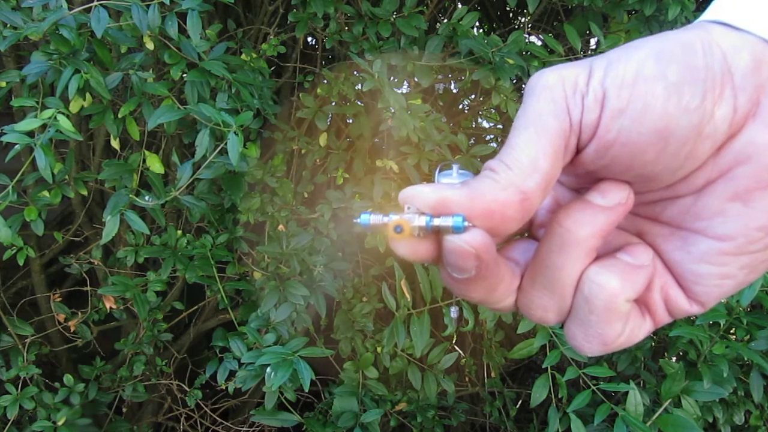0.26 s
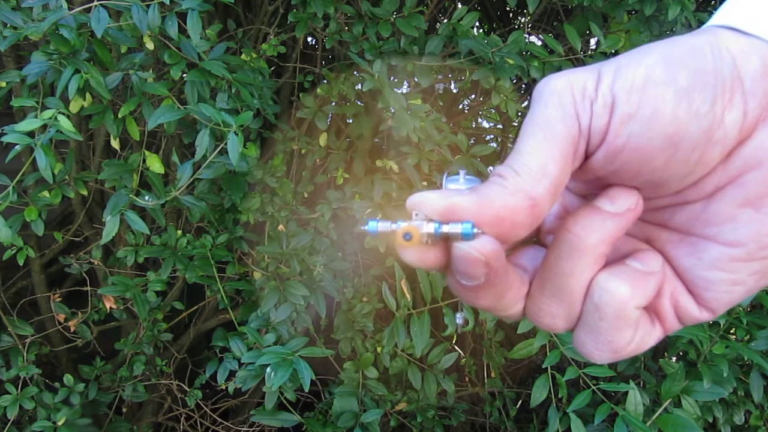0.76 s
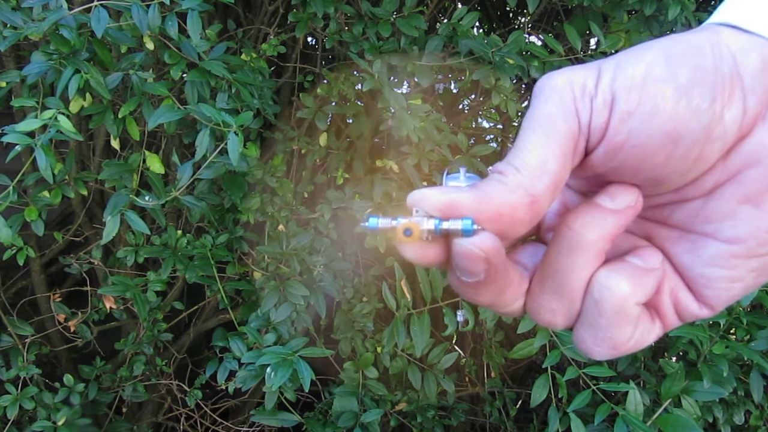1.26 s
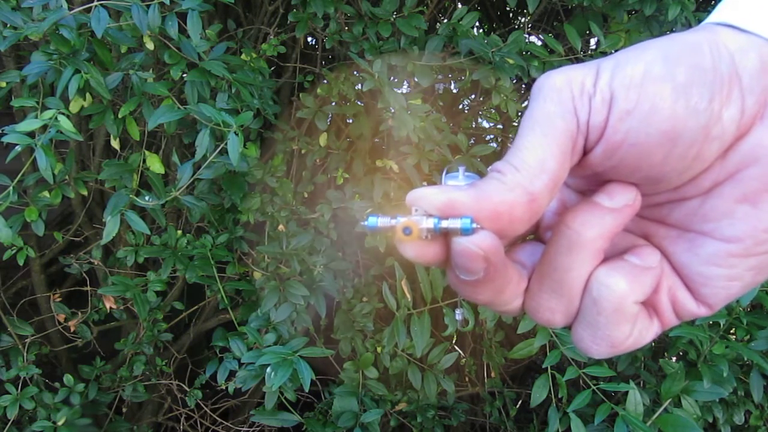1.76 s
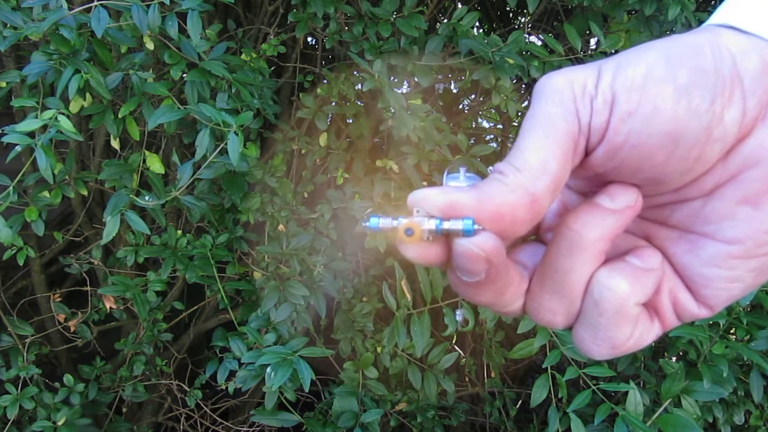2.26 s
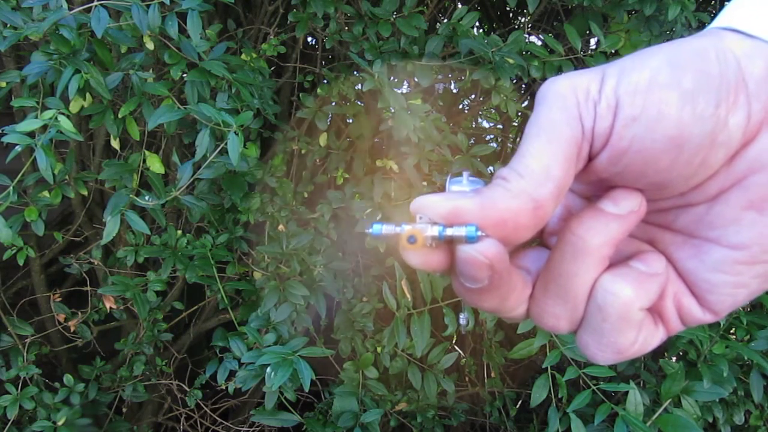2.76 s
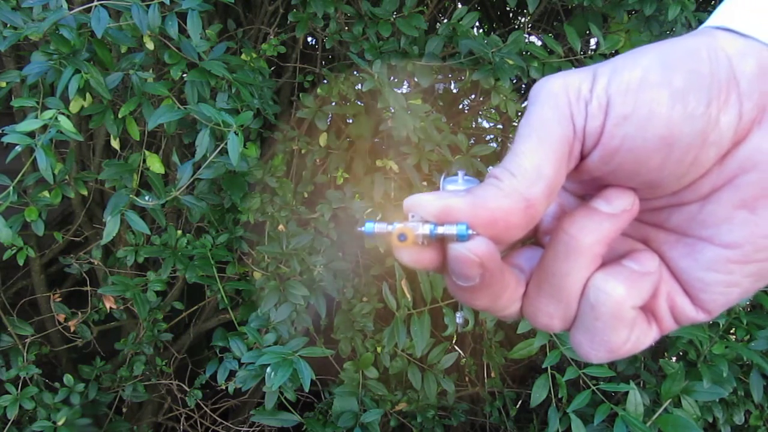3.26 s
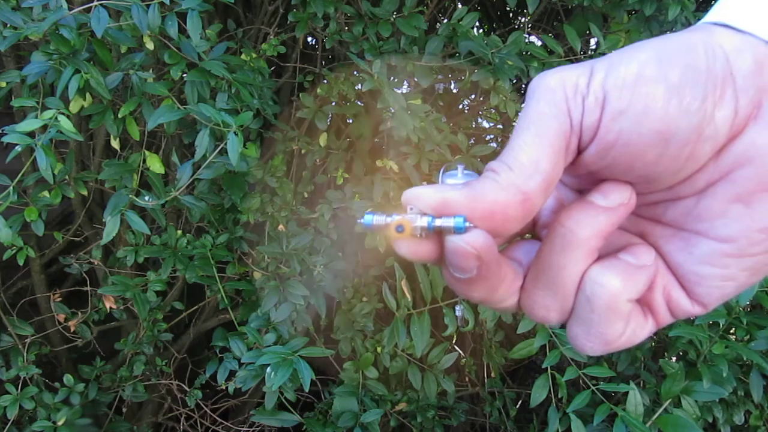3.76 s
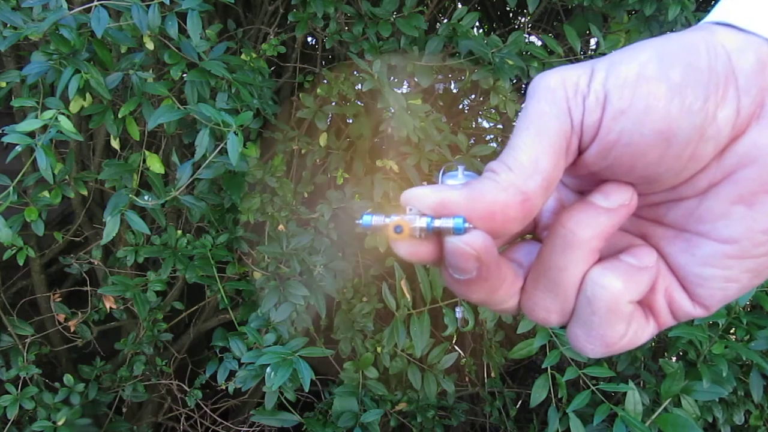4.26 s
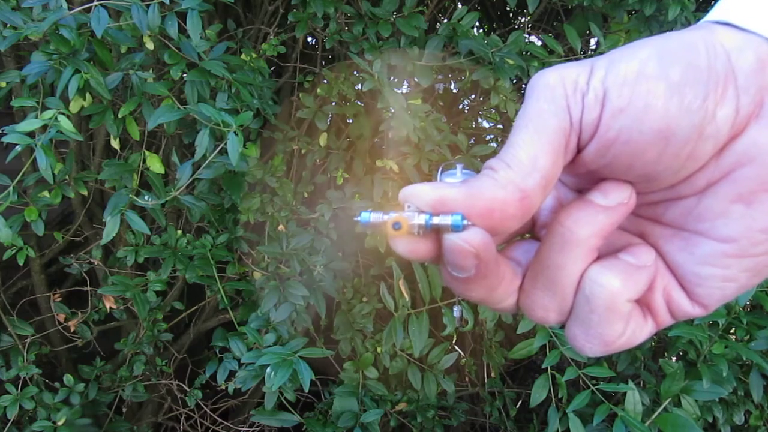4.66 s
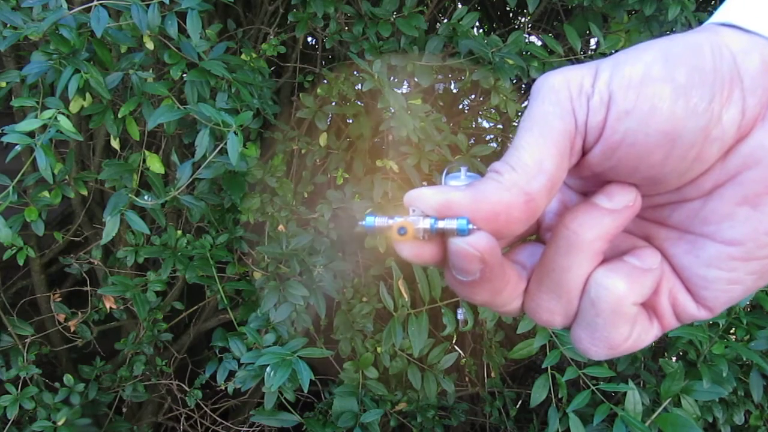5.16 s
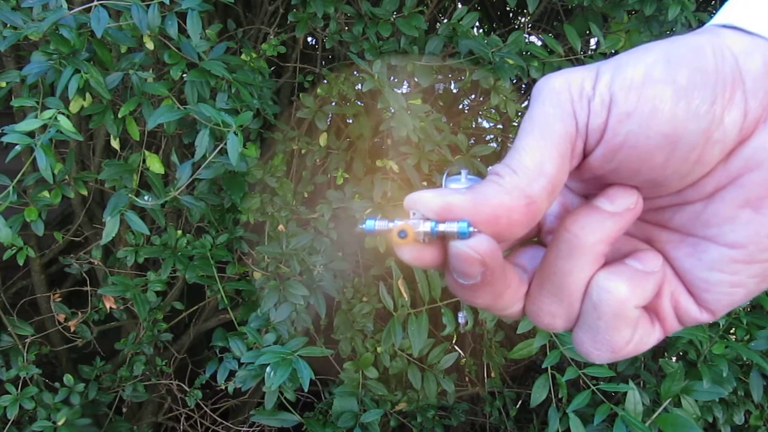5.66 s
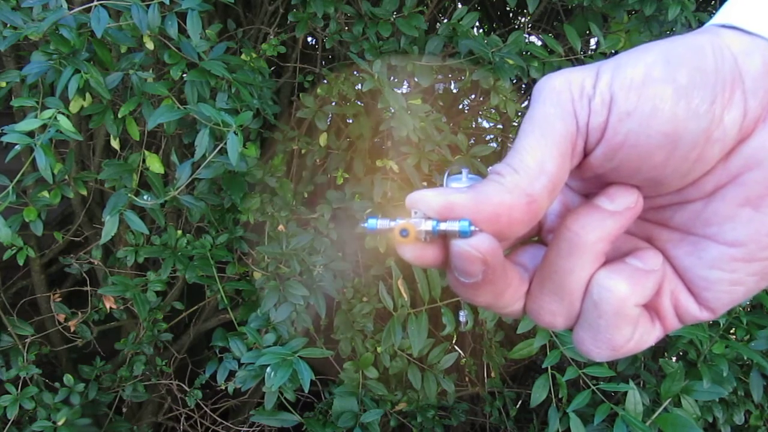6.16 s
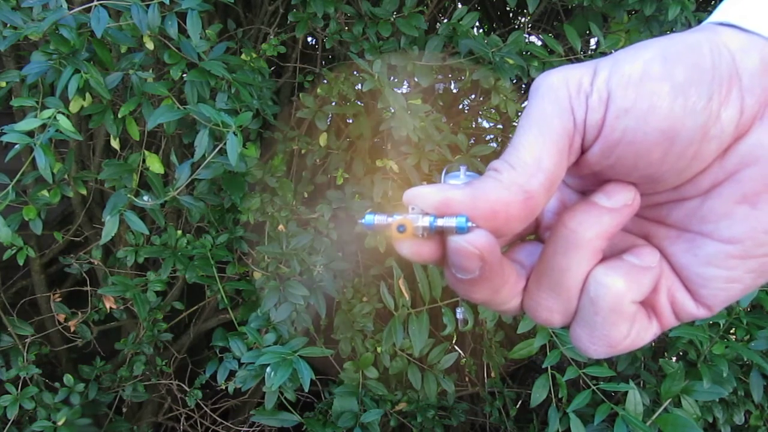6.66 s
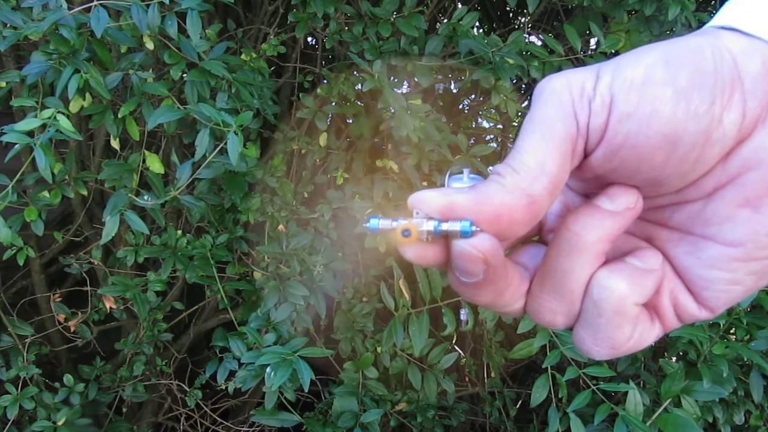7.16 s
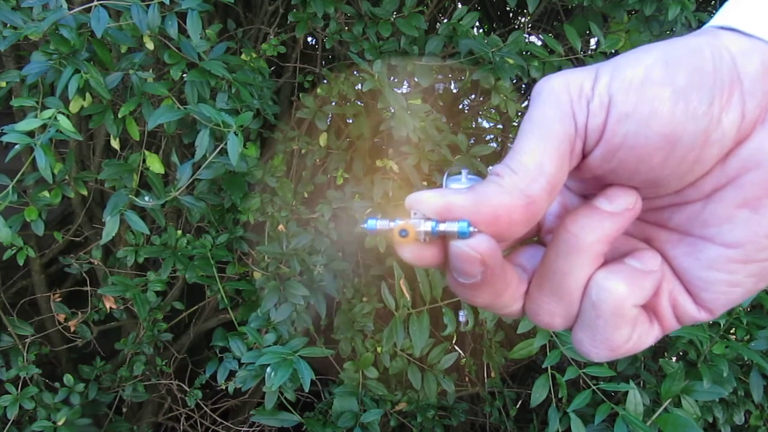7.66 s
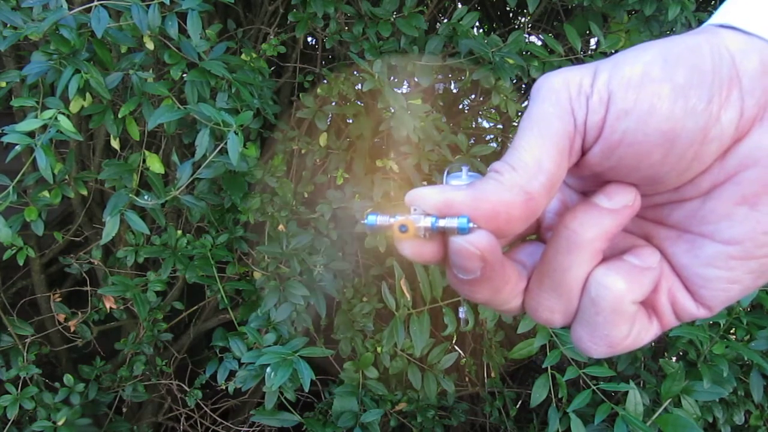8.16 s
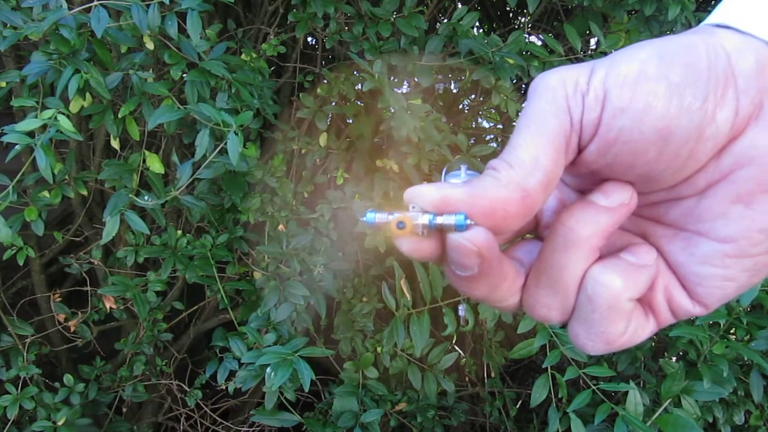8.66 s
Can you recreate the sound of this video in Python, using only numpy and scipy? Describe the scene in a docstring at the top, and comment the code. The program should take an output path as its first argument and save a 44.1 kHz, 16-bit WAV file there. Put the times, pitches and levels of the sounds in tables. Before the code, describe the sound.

A tiny gas-driven engine buzzes close up in a rapid, dry metallic clatter, gradually slowing, with faint hiss and low wind thumps on the microphone.

```python
"""A tiny gas-driven boxer engine runs outdoors in a hand, close to the microphone, for about nine seconds.
It starts at 63 turns a second and sinks to 39 with its gas pressure, over a steady leak, a low hum and a quiet garden.
Every turn makes a dry snap (a pressure pulse), then a bright double tick of the valve gear (a pulse that rings metal),
then a puff of exhaust (a soft push and a burst of noise).
From 0.3 s on, mostly in three spells, eddies thump on the microphone: pressure swings in noisy wakes."""
import sys
import numpy as np
from scipy import signal
from scipy.fft import rfft, irfft, next_fast_len
from scipy.io import wavfile
from scipy.ndimage import uniform_filter1d, map_coordinates

SR = 44100
rng = np.random.default_rng(int(sys.argv[2]) if len(sys.argv) > 2 else 0)


def log_audio(samples):
    """Write samples as a 16-bit WAV file to the path given in sys.argv[1]."""
    # one column per channel
    frames = np.atleast_2d(samples).T
    # limit to full scale, then quantise
    limited = np.clip(frames, -1, 1)
    pcm = np.round(limited * 32767).astype(np.int16)
    wavfile.write(sys.argv[1], SR, pcm)


N = 392475
TIME = np.arange(N) / SR  # s
CRUISE = 55  # turns per second at which the growth laws add nothing
TOP_HZ = 16300


def crank():
    """Speed (turns per second) and angle (turns) of the crank; the snap falls on whole turns."""
    # crank speed, sinking with the gas pressure: t/s, speed/(turns per second)
    speed_curve = [(0.0, 63.285), (1.01, 60.072), (1.16, 59.173), (1.51, 58.639), (2.26, 55.815),
                   (2.37, 55.936), (3.14, 53.427), (3.92, 51.433), (4.85, 48.436), (5.6, 47.39),
                   (5.94, 46.476), (6.2, 46.224), (6.59, 44.037), (6.99, 43.342), (7.21, 42.467),
                   (7.34, 42.643), (8.28, 39.904), (8.9, 38.968)]
    speed = np.interp(TIME, *np.transpose(speed_curve))
    start_angle = -.245
    return speed, np.cumsum(speed) / SR + start_angle


def snap(angle, speed, edge_hz=5700, edge_width_hz=900):
    """A port opens on compressed gas: one short, clean pressure pulse a turn."""
    # colour of the snap: f/Hz, level/dB
    snap_colour = [(100, -11.5), (750, -3), (2100, -3.5), (2900, 8), (3900, 12.5), (5400, 13), (6700, 6.5),
                   (7400, 8.5), (8600, -2), (9700, -15), (11000, -10), (13000, -45), (16000, -54)]
    # quick echoes off the fingers: delay/s, signed share
    fingers = [(.00052, -.11), (.00125, 0.048), (.00165, .08), (.0019, -0.13)]
    level_db = per_turn(speed, axis=1) + driven(speed, level_db=-0.5, growth=-0.17)
    times, gains = strokes(angle, 0, level_db, jitter=.000003, scatter_db=.25)
    snaps = train(times, gains, blow(snap_colour, fingers))
    # the snap has a harder edge at low speed
    edge = filtered(snaps, lambda hz: bell(hz, edge_hz, edge_width_hz))
    edge_share = np.interp(speed, [42, 53, 62], [.35, .08, -.3])
    return snaps + edge_share * edge


def valve(angle, speed):
    """The valve gear touches lightly, then strikes; both blows rebound and ring the metal."""
    # colour of one blow: f/Hz, level/dB
    tick_colour = [(100, -17), (1700, -35), (3000, -25), (4300, -2), (5100, -7.5), (5800, -21),
                   (6700, -0.5), (8300, 6), (9700, 4.5), (11000, 0), (12300, -5.5), (13600, -13),
                   (14600, -12), (16000, -44)]
    # rebounds of the valve: delay/s, signed share
    rebounds = [(.00065, -.44), (.00096, .42)]
    # metal parts rung by the valve gear: f/Hz, resonant gain/dB, t60/s
    metal = [(2300, 2, .03), (4390, 9, .018), (4750, 4.5, .014), (7080, 4, .018), (8450, -10, .012),
             (9150, -11, .012), (10550, -9, .012), (13020, 0, .015)]
    touch_place, strike_place = .155, .201  # turns
    touch_lag = .000338  # s

    tick = blow(tick_colour, rebounds)
    t = np.arange(len(tick)) / SR
    # each mode lifts the tick at its own frequency and rings on
    ring = np.zeros(len(t))
    for hz, db, t60 in metal:
        unit_gain = 2 * np.log(1000) / (t60 * SR)
        ring += amp(db - 60 * t / t60) * np.cos(2 * np.pi * hz * t) * unit_gain
    tick = tick + signal.fftconvolve(tick, ring)[:len(t)]

    # the touch softens as the crank slows
    touch_db = driven(speed, level_db=-14.0, growth=0.78)
    times, gains = strokes(angle, touch_place, touch_db, jitter=.000003, scatter_db=1.1)
    touch = train(times + touch_lag, gains, tick)
    strike_db = per_turn(speed, axis=2) + driven(speed, level_db=-3.5, growth=-.35)
    times, gains = strokes(angle, strike_place, strike_db, jitter=.000003, scatter_db=0.2)
    strike = train(times, gains, tick)
    # the touch pulls the opposite way; as the crank slows their gap widens,
    # so their comb of peaks sweeps down
    return strike - touch


def exhaust(angle, speed, rise=0.00081, fall=0.0012, push_growth=0.89, pipe_hz=4400, pipe_width_hz=500):
    """Spent gas leaves once a turn: a soft push of air, and just behind it a burst of jet noise."""
    # colour of the jet noise, then of the push: f/Hz, level/dB
    puff_colour = [(100, -4), (1200, -8), (1900, -4.5), (2600, -8), (3700, 3), (4700, 5), (5150, 3),
                   (6500, -1.5), (8300, 8), (8950, 7), (9600, 6.5), (11300, 2.5), (13400, -6.5),
                   (16000, -27)]
    push_colour = [(200, -56), (420, -9), (560, -5), (740, -1), (900, -11.5), (1150, -19), (1360, -5.5),
                   (1560, -24.5), (1850, -3), (2200, -37), (3000, -23), (6000, -58)]
    push_place, jet_place = .714, .735  # turns

    jet_db = driven(speed, level_db=-5.5, growth=0.47) + .5 * wobble(hz=6.3)
    times, gains = strokes(angle, jet_place, jet_db, jitter=.00001, scatter_db=.7)
    t = np.arange(-SR // 100, SR // 100) / SR
    opening = bell(t, 0, np.where(t < 0, rise, fall))  # rise and fall in s
    places = np.clip(np.round(times * SR).astype(int), 0, N - 1)
    kicks = np.bincount(places, gains, N)
    envelope = signal.fftconvolve(kicks, opening / np.linalg.norm(opening), "same")
    jet = envelope * noise(puff_colour)
    # the outlet's resonance stands out at high speed and is held back at lower speed
    pipe = filtered(jet, lambda hz: bell(hz, pipe_hz, pipe_width_hz))
    jet = jet + np.interp(speed, [42, 58, 62], [-.25, -.1, .8]) * pipe

    # the push has one shape in every turn, and is firmer when the pistons move fast
    push_db = driven(speed, level_db=-0.8, growth=push_growth)
    times, gains = strokes(angle, push_place, push_db, jitter=.00001, scatter_db=.5)
    push = filtered(train(times, gains, np.ones(1)), lambda hz: colour(push_colour, hz))
    return amp(-0.56) * jet + push


def hum(angle, speed):
    """The low orders of the gas flow crest just after the exhaust opens, and weaken as the crank slows."""
    # orders of the pulsing gas flow: multiple of the crank speed, relative level/dB
    flow_orders = [(1, 3), (2, 2), (3, -10), (4, -8), (5, -10), (6, -7), (7, -6.5), (8, -7.5), (9, -11)]
    # how the engine in the hand radiates them: f/Hz, gain/dB
    body = [(35, -7.5), (52, -5), (64, -6), (80, -5.5), (105, -3.5), (165, -1), (230, 2.5), (320, -4.5),
            (480, -6.5)]
    crest = .76  # turns
    orders = sum(amp(db) * np.cos(2 * np.pi * round(k) * (angle - crest)) for k, db in flow_orders)
    level = amp(driven(speed, level_db=-43.0, growth=1.2))
    return level * np.sqrt(2) * filtered(orders, lambda hz: colour(body, hz))


def leak(speed, level_db=-44.0, growth=2.65):
    """Gas seeps past the pistons as a steady hiss, less as the pressure sinks."""
    # colour of the hiss: f/Hz, relative density/(dB per Hz)
    leak_colour = [(200, 15.5), (1000, 8), (2000, 11.5), (4000, 10.5), (6000, 5), (9000, 1), (12000, 4),
                   (14000, -13), (16000, -36)]
    return amp(level_db) * (speed / CRUISE) ** growth * noise(leak_colour)


def surroundings(x, t60=0.028, level_db=-19):
    """Hand and leaves scatter a faint, very short tail of decaying noise."""
    t = np.arange(SR // 8) / SR
    build_up = 1 - np.exp(-(t / .002) ** 2)
    tail = rng.standard_normal(len(t)) * amp(-60 * t / t60) * build_up
    return amp(level_db) * signal.fftconvolve(x, tail / np.linalg.norm(tail))[:N]


def buffets(core_db, wake_db, wake_growth, cycles, breeze_db, flutter_db, mic_hz=32):
    """Each eddy is one swing of pressure in a short turbulent wake; weak turbulence flutters in breezes."""
    # strongest eddies on the microphone: t/s, relative level/dB, swing f/Hz, wake half-length/s
    eddies = [(0.355, -21.5, 180, 0.011), (.389, -11, 178, 0.014), (0.434, -20, 148, 0.012),
              (.63, -25, 125, 0.02), (.754, -20.5, 137, 0.018), (0.824, -13.5, 129, 0.015),
              (0.868, -21, 97, 0.01), (.929, -11.5, 220, 0.01), (.951, -13.5, 250, .007),
              (.974, -17, 176, .007), (1.029, -15, 136, 0.013), (1.247, -18.5, 127, 0.028),
              (1.319, -23, 132, 0.01), (1.435, -16.5, 127, 0.019), (1.51, -12.5, 162, 0.019),
              (1.549, -14, 126, 0.0038), (1.581, -19.5, 202, 0.019), (1.678, -21.5, 166, 0.023),
              (1.721, -24, 86, 0.0081), (1.826, -20.5, 156, 0.033), (2.067, -22, 113, 0.022),
              (3.49, -19, 45.3, 0.015), (4.31, -37, 74, 0.014), (4.564, -26.5, 65, 0.013),
              (4.802, -14, 182, 0.0074), (4.919, -30, 74, .014), (5.056, -24, 126, 0.023),
              (5.183, -18, 100, 0.019), (5.312, -20.5, 134, 0.014), (5.641, -26, 144, 0.013),
              (5.704, -21.5, 94, 0.021), (5.886, -16, 68.5, 0.02), (5.966, -23, 121, 0.005),
              (6.029, -25.5, 84, .014), (6.15, -18, 140, 0.023), (6.193, -18, 109, .008),
              (6.332, -12.5, 182, 0.0099), (6.393, -30, 161, 0.022), (6.484, -25.5, 106, .016),
              (7.214, -38, 78, .02), (7.58, -27, 75, 0.014), (8.174, -26.5, 42, .018),
              (8.317, -37, 76, 0.0091)]
    # spells of moving air with weak random eddies: start t/s, end t/s
    breezes = [(0.332, 2.24), (4.248, 6.6), (7.15, 8.35)]
    # turbulence behind a slow and behind a brisk eddy: f/Hz, relative density/(dB per Hz)
    slow_wake = [(15, -1.5), (50, 10.5), (120, -6), (300, -14.5), (900, -49), (3000, -100)]
    brisk_wake = [(15, -2), (60, 5), (150, 5.5), (320, -4.5), (500, -13), (900, -27), (2000, -60),
                  (6000, -100)]

    swings, slow_power, brisk_power = np.zeros((3, N))
    t = np.arange(-SR // 15, SR // 15) / SR
    phases = rng.uniform(0, 2 * np.pi, len(eddies))
    for (s, db, hz, wake_s), phase in zip(eddies, phases):
        span = np.clip(round(s * SR) + np.round(t * SR).astype(int), 0, N - 1)
        swing = np.cos(2 * np.pi * hz * t + phase) / np.cosh(2 * hz * t / cycles)
        swings[span] += amp(db + core_db) * swing
        # a stronger eddy stirs a stronger wake, a quicker one a brighter wake
        power = amp(wake_db + wake_growth * db) ** 2 * np.exp(-(t / wake_s) ** 2)
        brisk_share = np.interp(hz, [55, 170], [0, 1])
        slow_power[span] += (1 - brisk_share) * power
        brisk_power[span] += brisk_share * power

    in_breeze = sum((TIME > start) & (TIME < end) for start, end in breezes) * 1.0
    windy = np.abs(uniform_filter1d(in_breeze, size=SR // 8))  # soft starts and ends
    flutter = flutter_db * np.tanh(wobble(hz=16))
    slow_power = slow_power + windy * amp(breeze_db + flutter) ** 2
    # the microphone does not follow the slowest part of a swing
    swings = filtered(swings, lambda hz: 1j * hz / (1j * hz + mic_hz))
    return swings + np.sqrt(slow_power) * noise(slow_wake) + np.sqrt(brisk_power) * noise(brisk_wake)


def garden():
    """The quiet garden is a steady, dark bed of noise."""
    # colour of the bed: f/Hz, relative density/(dB per Hz)
    garden_colour = [(20, 4), (60, -1), (150, -13), (400, -6.5), (700, -11.5), (1200, -17.5), (3000, -43),
                     (12000, -45)]
    return amp(-52) * noise(garden_colour)


def strokes(angle, place, level_db, jitter, scatter_db):
    """Times (s) at which the crank passes a place in its turn, and the strength of each stroke."""
    passes = np.arange(np.ceil(angle[0] - place), angle[-1] - place) + place
    times = np.interp(passes, angle, TIME)
    chance = rng.standard_normal((len(times), 2))
    gains = amp(np.interp(times, TIME, level_db) + scatter_db * chance[:, 1])
    return times + jitter * chance[:, 0], gains


def per_turn(speed, axis):
    """Energy in dB of one turn: a column of the levels, shared among the turns of a second."""
    # loudness of the running engine: t/s, base level of the snap/dB, base level of the valve tick/dB
    levels = [(0.0, -32, -29), (0.84, -32, -29), (0.96, -34.5, -31.5), (1.96, -34.5, -32.5),
              (2.35, -33, -29.5), (2.82, -34, -31.5), (3.49, -34, -31), (4.56, -34, -33),
              (6.67, -36.5, -37), (6.99, -35, -33.5), (8.06, -36, -33.5), (8.08, -36.5, -35),
              (8.82, -37.5, -33.5), (8.9, -37.5, -34)]
    columns = np.transpose(levels)
    return np.interp(TIME, columns[0], columns[axis]) + 10 * np.log10(SR / speed)


def driven(speed, level_db, growth):
    """Level in dB of a sound whose strength goes with a power of the crank speed."""
    return level_db + growth * 20 * np.log10(speed / CRUISE)


def blow(points, echoes=(), size=4096):
    """A causal (minimum-phase) pulse of the given colour, followed by its echoes."""
    hz = np.fft.rfftfreq(size, 1 / SR)
    # folding the cepstrum forward puts the energy at the start
    cepstrum = irfft(np.log(colour(points, hz)))
    cepstrum[1:size // 2] *= 2
    cepstrum[size // 2 + 1:] = 0
    comb = 1 + sum(share * np.exp(-2j * np.pi * hz * delay) for delay, share in echoes)
    return irfft(np.exp(rfft(cepstrum)) * comb)


def train(times, gains, pulse, size=8):
    """The pulse, at unit energy, played at times that fall between samples."""
    index = np.floor(times * SR).astype(int)[:, None] + np.arange(1 - size, size + 1)
    offset = index - times[:, None] * SR
    # windowed sinc interpolation
    taps = gains[:, None] * np.sinc(offset) * np.cos(np.pi * offset / (2 * size)) ** 2
    inside = (index >= 0) & (index < N)
    clicks = np.bincount(index[inside], taps[inside], N)
    return signal.fftconvolve(clicks, pulse / np.linalg.norm(pulse))[:N]


def wobble(hz):
    """A smooth random curve with about hz bends a second."""
    return map_coordinates(rng.standard_normal(int(N * hz / SR) + 4), [TIME * hz])


def noise(points):
    """Coloured noise of rms 1."""
    return unit(filtered(rng.standard_normal(N), lambda hz: colour(points, hz)))


def colour(points, hz):
    """Gain of (Hz, dB) points joined on a log axis."""
    f, db = np.transpose(points)
    return amp(np.interp(np.log(hz + 1), np.log(f), db))


def filtered(x, response):
    """x shaped by a response of frequency."""
    m = next_fast_len(N + SR // 2)
    return irfft(rfft(x, m) * response(np.fft.rfftfreq(m, 1 / SR)), m)[:N]


def bell(x, centre, width):
    """Gaussian curve with a peak of 1."""
    return np.exp(-.5 * ((x - centre) / width) ** 2)


def unit(x):
    """Scale to rms 1."""
    return x / np.sqrt(np.mean(x ** 2) + 1e-20)


def amp(db):
    """Decibels to gain."""
    return 10 ** (np.asarray(db) / 20)


def scene():
    """The engine, the air on the microphone and the quiet garden."""
    speed, angle = crank()
    engine = snap(angle, speed) + valve(angle, speed) + exhaust(angle, speed)
    gas = hum(angle, speed) + leak(speed)
    air = buffets(core_db=5.5, wake_db=-14.5, wake_growth=0.63, cycles=0.32, breeze_db=-48.0, flutter_db=7)
    return (engine + surroundings(engine) + gas + air + garden())[None]


def record(dry):
    """Nothing passes above the band limit."""
    return np.array([filtered(channel, lambda hz: hz < TOP_HZ) for channel in dry])


dry = scene()
out = record(dry)
log_audio(out)
```